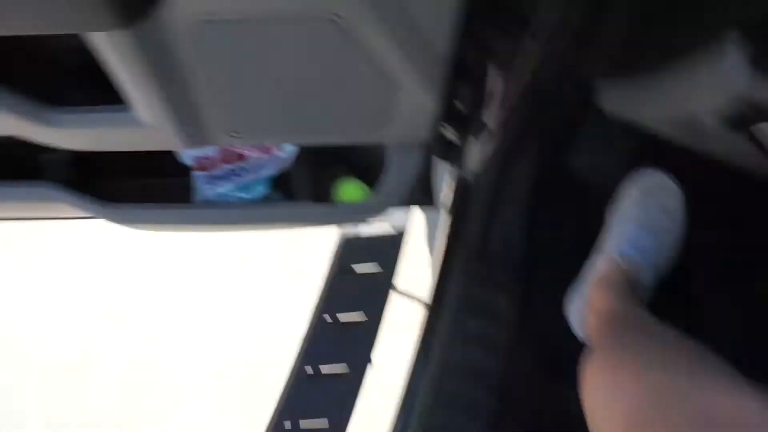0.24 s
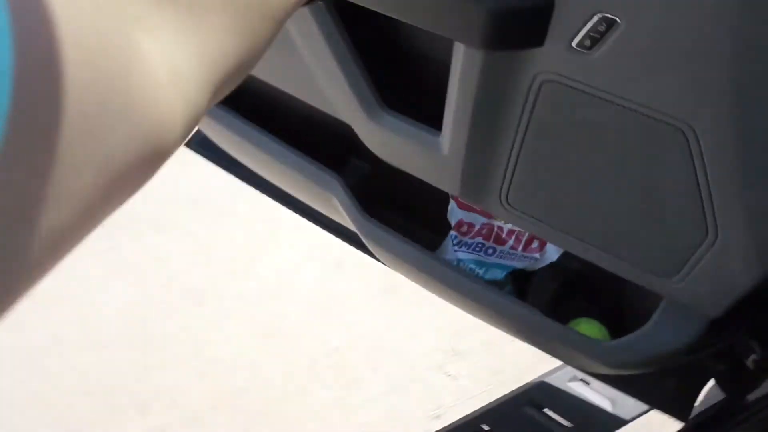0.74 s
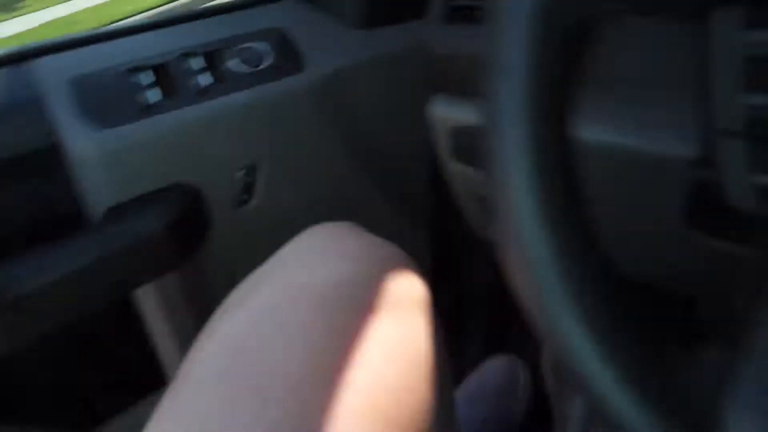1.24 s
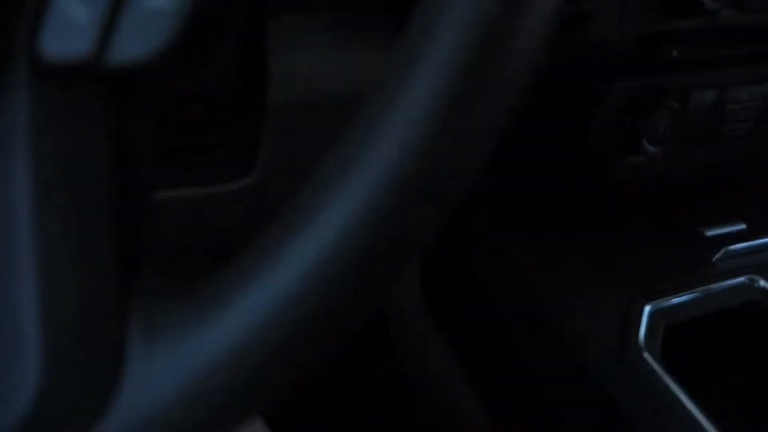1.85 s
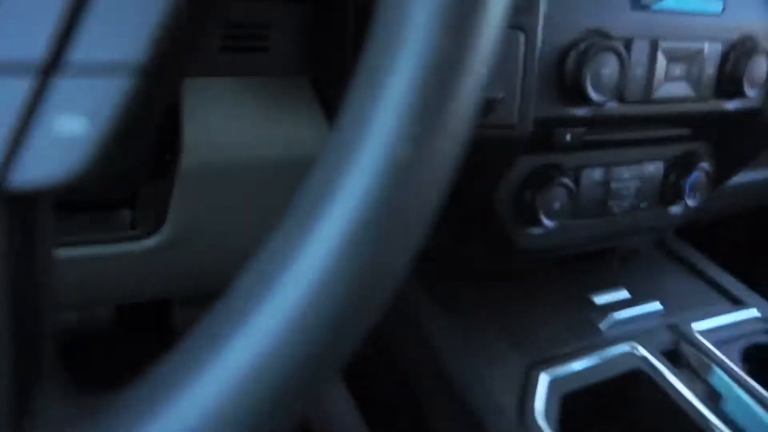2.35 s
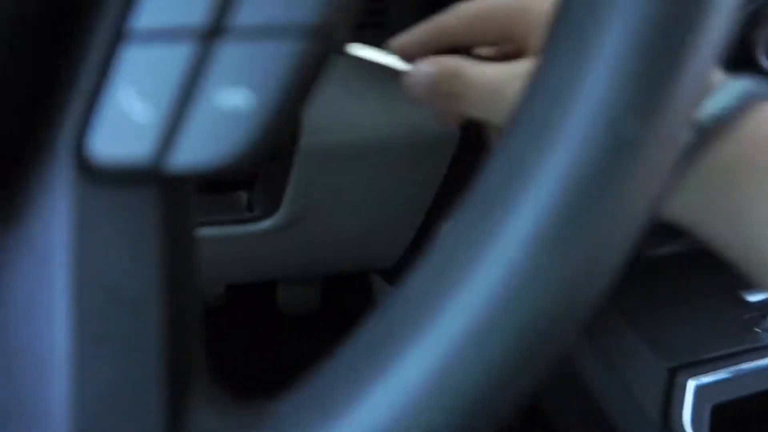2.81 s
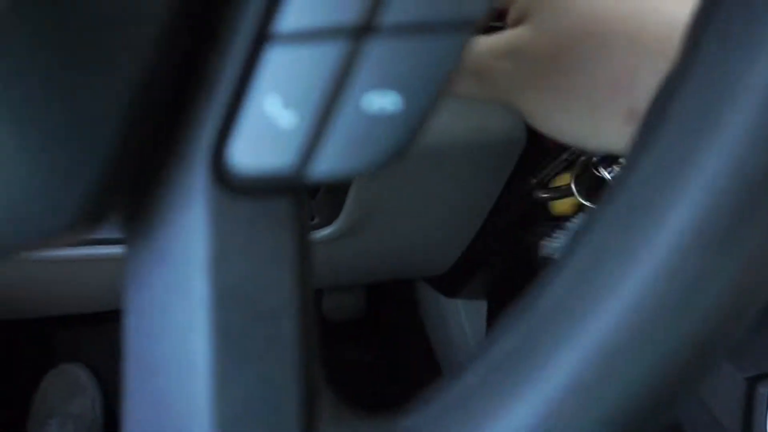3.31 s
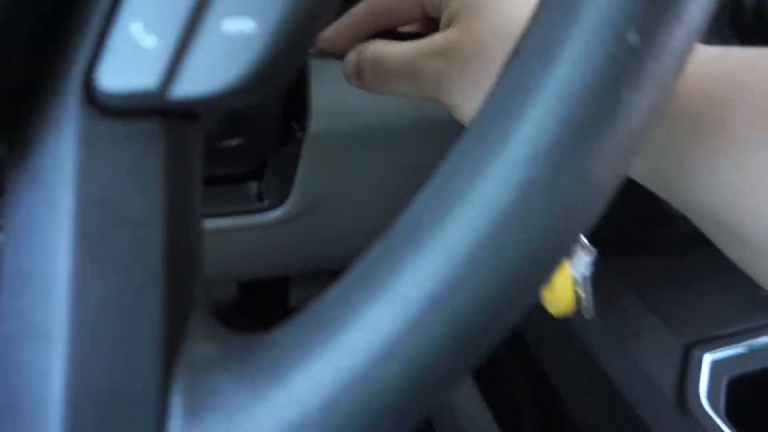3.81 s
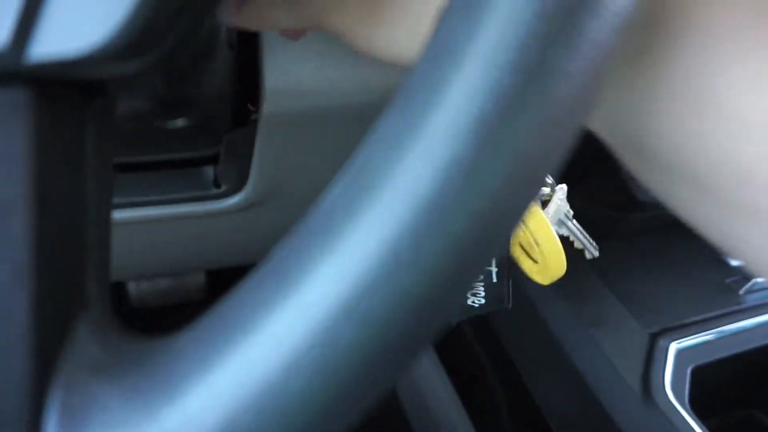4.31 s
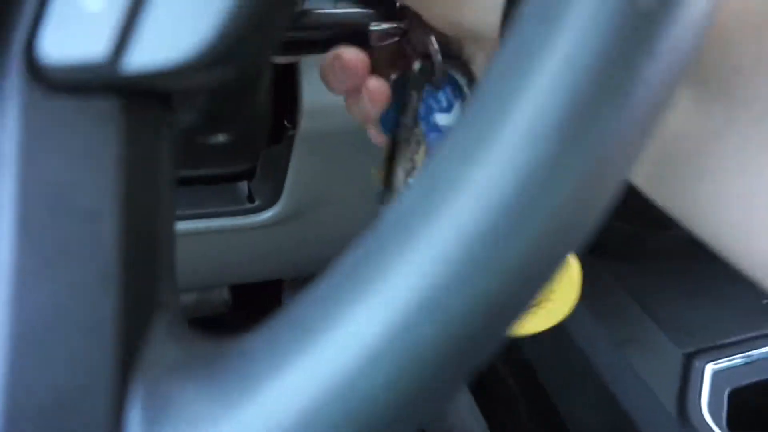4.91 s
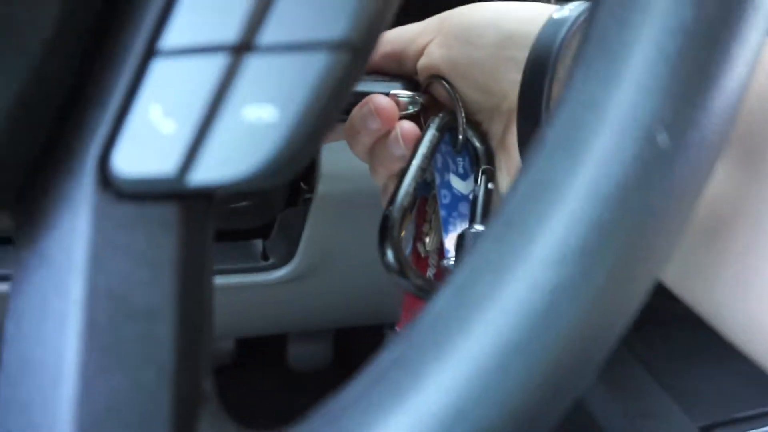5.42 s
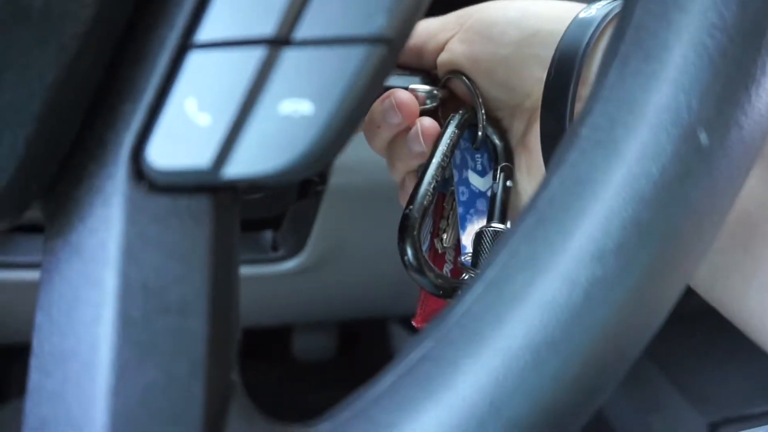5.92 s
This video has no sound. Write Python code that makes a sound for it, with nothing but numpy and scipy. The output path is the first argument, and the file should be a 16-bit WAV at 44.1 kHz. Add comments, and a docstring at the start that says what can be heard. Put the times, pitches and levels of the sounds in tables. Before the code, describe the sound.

Camera handling ticks and cloth rustle, a vehicle door thuds shut, keys jangle and knock at the ignition, then the engine starts cranking.

```python
"""A bunch of keys jingles and knocks in a pickup cab: noise grains plus decaying metal and plastic modes. The
key rasps into the lock as filtered grains; the engine rumbles as noise and harmonics of a rising firing rate,
under tonal swells: low starter whine and one higher whistle. Before that the door shuts: noise bursts, panel
modes and low cab tones. A camera is held in hand: its casing ticks and bumps, skin and clothes rub as grains
through moving combs. Low-level coloured noise is the cab background."""
import sys
import numpy as np
from scipy import signal
from scipy.fft import rfft, irfft, next_fast_len
from scipy.io import wavfile
from scipy.ndimage import uniform_filter1d

SR = 44100
rng = np.random.default_rng(int(sys.argv[2]) if len(sys.argv) > 2 else 0)


def transcribe(signal):
    """Save signal, clipped to [-1, 1], as a 16-bit WAV file at the path in sys.argv[1]."""
    frames = np.atleast_2d(signal).T
    limited = np.clip(frames, -1, 1)
    pcm = np.round(limited * 32767).astype(np.int16)
    wavfile.write(sys.argv[1], SR, pcm)


N = 271215
T = np.arange(N) / SR
SHORT = T[:SR // 2]  # time axis of one blow, s


# Key clashes: t/s, relative level/dB, clatter length/s
KEY_CLASHES = [(2.5084, -20.5, 0.015), (2.6552, -19, 0.047), (2.686, -19.5, 0.063), (2.7712, -12, 0.04),
               (2.791, -5, 0.026), (2.8483, -7.5, 0.013), (2.948, -24, 0.04), (2.993, -21, 0.035),
               (3.1997, -25.5, 0.035), (3.302, -16.5, 0.056), (3.3172, -12, 0.06), (3.8558, -15.5, 0.018),
               (4.015, -27.5, 0.024), (4.074, -18.5, 0.016), (4.2733, -9, 0.033), (4.3308, -11, 0.3),
               (4.433, -8.5, 0.025), (4.4897, -12, 0.036), (4.605, -24, 0.014), (4.671, -12.5, 0.015),
               (4.7264, -16, 0.04), (4.782, -10.5, 0.08), (4.789, -5, 0.033), (4.8982, -11.5, 0.046),
               (4.9231, -11, 0.08), (5.0645, -19, 0.035), (5.2963, -30, 0.045), (5.356, -31.5, 0.016),
               (5.625, -37, 0.018)]
# Clash spectrum: f/Hz, level/dB
CLASH_SPECTRUM = [(880, -17), (1500, -10), (2770, 0.5), (3550, -5.5), (4590, -1.5), (5020, 0), (9370, 0.5),
                  (11200, 5), (16000, -8)]
# Metal modes of the keys: f/Hz, level/dB
KEY_MODES = [(5755, -11), (7150, -9), (8543, -9.5), (9800, -7), (10930, -16.5), (11150, -1), (11650, -11),
             (12300, -7), (12610, 0.5), (14200, -16), (14860, -6)]
# Free-hanging key sings: t/s, relative level/dB, hold before decay/s
KEY_RINGS = [(2.68, -27.5, 0.018), (2.7952, -20, 0.005), (2.955, -18, 0.022), (2.98, -14, 0.014),
             (3.032, -16, 0.018), (3.075, -22, 0.022), (3.17, -31, 0.026), (3.3024, -11, 0.0089),
             (3.5214, -29.5, 0.02), (3.787, -32, 0.036), (4.0756, -43, 0.0038), (4.356, -15, 0.0099),
             (4.5307, -24.5, 0.0085), (4.573, -28, 0.026), (4.916, -25, 0.018), (5.188, -35.5, 0.005),
             (5.2954, -41.5, 0.032)]
RING_HZ, RING_T60_S = 10185, 0.17


def keys():
    """Metal contacts clatter as grains and excite key modes; one free key sings; the bunch jingles between."""
    out = np.zeros((2, N))
    for t_s, db, length_s in KEY_CLASHES:
        contacts = grains(len(SHORT), rate_hz=1700, spread_db=1, t60_s=0.021)
        contacts = contacts * fade(2 * length_s) * onset(0.0006)
        metal = ring(KEY_MODES, t60_s=0.16, scatter_db=5, detune=0.02) * onset(0.003)
        clash = peak(colour(contacts, CLASH_SPECTRUM), db - 8) + peak(metal, db - 19)
        add(out, t_s, clash, pan_db=2 + 2 * rng.standard_normal())

    for t_s, db, hold_s in KEY_RINGS:
        tone = ring([(RING_HZ, 0)], t60_s=np.inf, scatter_db=0, detune=0.001)
        tone = tone * amp(-60 * np.maximum(SHORT - hold_s, 0) / RING_T60_S)
        # chatter against the key ring: level trembles, 130 random points/s
        chatter = 1 + 0.25 * np.interp(SHORT * 130, np.arange(200), rng.standard_normal(200))
        neighbours = ring(KEY_MODES, t60_s=0.2, scatter_db=5, detune=0.018)
        singing = peak(tone * chatter, db - 0.5) + peak(neighbours, db - 15)
        add(out, t_s, singing * onset(0.0015), pan_db=5.5)

    clinks = np.zeros((2, N))
    for t_s in rng.uniform(KEY_CLASHES[0][0], KEY_CLASHES[-1][0], size=130):
        clink = ring(KEY_MODES, t60_s=0.11, scatter_db=7, detune=0.035)
        add(clinks, t_s, peak(clink, 2 * rng.standard_normal()))
    contacts = grains(N, rate_hz=210, spread_db=2.5, t60_s=0.087)
    jingle = 0.52 * unit(colour(contacts, CLASH_SPECTRUM)) + 1.05 * clinks
    add(out, 0, amp(-0.5) * swing() * jingle, pan_db=0.5)
    return out


# Hand moves bunch and key: t/s, hold/s, jingle level/dB, scrape level/dB
HAND_MOVES = [(2.65, 0.5, -32.5, -53.5), (2.95, 0.041, -38, -78), (3.19, 0.023, -29, -60),
              (3.45, 0.22, -37.5, -51.5), (3.78, 0.1, -38, -51.5), (4.08, 0.17, -46, -37.5),
              (4.28, 0.23, -39.5, -27.5), (4.5, 0.23, -49, -41), (4.72, 0.16, -29, -33.5),
              (4.905, 0.049, -23.5, -28), (4.99, 0.13, -62, -51.5), (5.16, 0.27, -66, -51.5)]
MOVE_RISE_S, MOVE_T60_S = 0.013, 0.3
SWING_DB, SWING_T60_S = -26, 0.92  # jingle left by a clash: level re clash, decay


def swing():
    """Jingle gain: hand movement and the decaying swing after each clash add in power."""
    moved = gestures(HAND_MOVES, MOVE_RISE_S, MOVE_T60_S)[0]
    stirs = [(t_s, length_s, db + SWING_DB) for t_s, db, length_s in KEY_CLASHES]
    stirred = gestures(stirs, MOVE_RISE_S, SWING_T60_S)[0]
    return np.hypot(moved, stirred)


# Key and fob knocks: t/s, hollow level/dB, edge level/dB, body level/dB (all relative)
KNOCKS = [(2.615, -31, -29, -65), (2.793, -27, -17, -42.5), (2.851, -7, -9.5, -26),
          (3.012, -29.5, -32, -30.5), (3.073, -34.5, -56, -35.5), (3.193, -24.5, -52.5, -42.5),
          (3.438, -15, -21, -33), (3.455, -24, -25, -42), (3.606, -25, -35.5, -32.5),
          (3.72, -27.5, -46, -33.5), (3.736, -26, -43, -30), (4.084, -30, -25, -69),
          (4.131, -17.5, -25, -35.5), (4.229, -14.5, -25.5, -46), (4.274, -7.5, -8, -29),
          (4.306, -10.5, -11.5, -43), (4.38, -7, -9.5, -40.5), (4.399, -16, -14, -37),
          (4.418, -12, -7.5, -47.5), (4.436, -6, -12, -27.5), (4.456, -10, -19, -32),
          (4.469, -8.5, -24, -27), (4.73, -18.5, -19, -41), (4.774, -16, -17.5, -39), (4.79, -16, -14, -48),
          (4.896, -19.5, -15.5, -39), (4.931, -17.5, -18.5, -35), (5.069, -24, -30.5, -51)]
# Column contact spectrum: f/Hz, level/dB
COLUMN_SPECTRUM = [(300, -6.5), (500, -6.5), (820, 2), (1400, -2.5), (1900, -7), (2500, -24)]
# Modes of the hollow plastic column: f/Hz, level/dB
COLUMN_MODES = [(716, -2.5), (825, 3.5), (985, -4), (1130, -6.5), (1434, -15.5), (1720, -7), (2220, 1.5),
                (2700, -11.5), (3600, -21.5)]
# Lock contact spectrum: f/Hz, level/dB
LOCK_SPECTRUM = [(1400, 2), (2400, 1), (3400, 2.5), (4600, -3.5), (7000, -13)]


def ignition():
    """Knocks excite the hollow plastic column; the key's contacts with the lock tumblers make a scrape."""
    out = np.zeros((2, N))
    for t_s, db, edge_db, body_db in KNOCKS:
        first = noise(len(SHORT)) * fade(0.014)
        bounces = grains(len(SHORT), rate_hz=1200, spread_db=4, t60_s=0.02) * fade(0.06)
        contacts = first + amp(5) * bounces
        modes = ring(COLUMN_MODES, t60_s=0.08, scatter_db=4, detune=0.02)
        hollow = peak(colour(contacts, COLUMN_SPECTRUM), db - 9) + peak(modes, db - 10)
        edge = peak(colour(contacts, LOCK_SPECTRUM), edge_db - 2)
        body = noise(len(SHORT)) * fade(0.081) * onset(0.00093)
        body = colour(body, [(160, -3.5), (300, -9.5), (430, 1.5), (600, -6)])
        add(out, t_s, hollow + edge + peak(body, body_db), pan_db=1)

    contacts = grains(N, rate_hz=360, spread_db=3.5, t60_s=0.008)
    scrape = amp(-2) * unit(colour(contacts, COLUMN_SPECTRUM))
    scrape += amp(-1) * unit(colour(contacts, LOCK_SPECTRUM))
    # the pushing hand shakes the column
    shudder = amp(-11.5) * unit(colour(noise(N), [(45, -18), (100, -1), (300, -9.5)]))
    push = gestures(HAND_MOVES, MOVE_RISE_S, MOVE_T60_S)[1]
    add(out, 0, push * (scrape + shudder), pan_db=-0.5)
    return out


# Engine gain while it turns over: t/s, relative level/dB
CRANK_LEVELS = [(5.17, -53), (5.23, -34), (5.48, -41), (5.7, -35), (5.8, -34.5), (5.9, -37.5), (6.03, -27),
                (6.15, -30)]
# Engine rumble spectrum: f/Hz, level/dB
ENGINE_SPECTRUM = [(13, -21), (22, -1.5), (65, 2.5), (159, -9.5), (206, -11), (404, -15), (446, -21.5),
                   (613, -32), (1110, -47), (2500, -50), (3250, -50), (5500, -77)]
# Firing rate: t/s, f/Hz
FIRING_RATE = [(5.2, 39.63), (5.75, 46.95), (6.1, 57.6)]
FIRING_DB = -11
# Tonal swells: centre t/s, level/dB, nominal tone f/Hz (low starter whine; one higher whistle near 1.1 kHz)
TONE_SWELLS = [(5.246, -42, 310), (5.417, -48.5, 1112), (5.54, -39.5, 456), (5.629, -37.5, 439),
               (5.721, -37.5, 459), (5.825, -36.5, 456.6), (5.93, -47, 425)]


def engine():
    """Bulkhead-muffled noise and firing harmonics throb; tones swell with noise around them: the starter whine
    and one higher whistle."""
    rumble = unit(colour(noise(N), ENGINE_SPECTRUM))
    # bass through the floor: same in both channels below about 350 Hz
    low_pass = signal.butter(2, 350, fs=SR, output="sos")
    rumble = rumble + signal.sosfiltfilt(low_pass, rumble.mean(axis=0) - rumble)

    firing_hz = np.interp(T, *np.transpose(FIRING_RATE))
    phase = 2 * np.pi * np.cumsum(firing_hz) / SR
    throb = np.sin(phase) + amp(-16) * np.sin(2 * phase) + amp(-0.5) * np.sin(3 * phase)
    out = curve(CRANK_LEVELS) * (amp(0.5) * rumble + amp(FIRING_DB) * throb)

    centre_s = SHORT.mean()
    for t_s, db, hz in TONE_SWELLS:
        swell = np.exp(-((SHORT - centre_s) / 0.034) ** 2)
        whine_hz = hz * (0.95 + 0.0604 * swell)
        whine = np.sin(2 * np.pi * np.cumsum(whine_hz) / SR)
        mesh_spectrum = [(0.75 * hz, -8), (hz, 0), (1.3 * hz, -13), (1.85 * hz, -13), (3 * hz, -24)]
        mesh = unit(colour(noise(len(SHORT)), mesh_spectrum))
        add(out, t_s - centre_s, swell * amp(db) * (whine + 0.5 * mesh))
    return out


# Door meets latch, seal, frame: t/s, latch level/dB, thud level/dB (both relative), t60/s, rise constant/s
DOOR_HITS = [(1.470, -5.5, -14, 0.057, 0.00015), (1.474, -13.5, -2.5, 0.069, 0.00068),
             (1.565, -17, -12, 0.11, 0.027), (1.59, -3, -13, 0.045, 0.0012),
             (1.598, -5.5, 1.5, 0.028, 0.00067)]
# Latch spectrum: f/Hz, level/dB
LATCH_SPECTRUM = [(500, 1.5), (1000, -7), (1800, -5.5), (2900, -16.5), (4900, -35), (12000, -41)]
# Trim thud spectrum: f/Hz, level/dB
THUD_SPECTRUM = [(140, -2), (190, -5), (300, 1), (470, -2), (620, -17), (900, -15.5)]
# Air resonances of the closed cab: f/Hz, level/dB, t60/s
CAB_BOOM = [(33.3, -16, 0.97), (43.7, -22, 0.29), (79.3, -25, 0.38), (98, -19, 0.075), (163, -40.5, 0.93)]
DOOR_SEALS_S = 1.61


def door():
    """Latch noise cracks, trim noise and panel modes thud; sealed cab air rings at low resonances."""
    out = np.zeros((2, N))
    for t_s, latch_db, thud_db, t60_s, rise_s in DOOR_HITS:
        latch = noise(len(SHORT)) * onset(rise_s) * (fade(t60_s) + amp(-45) * fade(0.11))
        trim = noise(len(SHORT)) * onset(rise_s) * (fade(t60_s) + amp(-31.5) * fade(0.36))
        panel = ring([(170, 8), (270, -3), (380, -10), (480, -2)], t60_s, scatter_db=-3, detune=0.022)
        hit = peak(colour(latch, LATCH_SPECTRUM), latch_db - 7.5)
        hit += peak(colour(trim, THUD_SPECTRUM), thud_db - 10.5)
        hit += peak(panel * onset(rise_s), thud_db - 13.5)
        add(out, t_s, hit, pan_db=3)

    air = sum(amp(db) * fade(t60_s) * np.sin(2 * np.pi * hz * SHORT) for hz, db, t60_s in CAB_BOOM)
    # rocking body stirs the air unevenly
    rocking = unit(colour(noise(len(SHORT)), [(32, 10), (50, -9), (90, -6.5)]))
    rocking = amp(-20) * fade(1.45) * rocking
    fade_out = np.clip((0.39 - SHORT) / 0.04, 0, 1)
    add(out, DOOR_SEALS_S, (air + rocking) * fade_out)
    return out


# Casing ticks under the fingers: t/s, shell level/dB, snap level/dB (both relative)
CASING_TICKS = [(0.171, -20, -31.5), (0.212, -17, -26), (0.2223, -15, -18), (0.2733, -17.5, -27),
                (0.3068, -14, -13.5), (0.3624, -40, -15), (0.555, -7.5, -16), (0.603, -13, -16.5),
                (0.667, -8.5, -19), (0.675, -8, -11.5), (0.9689, -14, -21.5), (0.9914, -23, -19),
                (1.0218, -23, -24), (1.3265, -27.5, -57), (2.1814, -8, -28), (2.248, -4.5, -37.5),
                (2.2846, -23, -35)]
# Dull bumps of body and hand: t/s, relative level/dB, f/Hz
HAND_BUMPS = [(0.036, -13, 308), (0.572, -9, 293), (0.648, -12, 340), (0.7038, -4, 567),
              (0.925, -16.5, 146), (0.95, -15.5, 129), (1.101, -24.5, 164), (1.3264, -21, 447),
              (1.37, -24.5, 173), (2.411, -29.5, 362), (2.439, -29.5, 600)]


def casing():
    """Finger ticks excite short plastic-shell modes with rattle and snap noise; bumps are low-pitched thuds."""
    out = np.zeros((2, N))
    for t_s, db, snap_db in CASING_TICKS:
        shell = ring([(2400, -3), (2850, 0), (3400, -6)], t60_s=0.008, scatter_db=0, detune=0.04)
        shell = shell * onset(0.0005)
        rattle = colour(noise(len(SHORT)) * fade(0.028), [(2100, -5), (2750, -1), (5000, -20)])
        snap = colour(noise(len(SHORT)) * fade(0.023), [(3000, 8.5), (6000, 1), (9700, 6), (15000, -3.5)])
        tick = peak(shell, db - 8) + peak(rattle, db - 23) + peak(snap, snap_db - 2)
        add(out, t_s, tick, pan_db=2.5)
    for t_s, db, hz in HAND_BUMPS:
        body = noise(len(SHORT)) * fade(0.07) * onset(0.00095)
        body = colour(body, [(120, -9), (hz, 0), (1400, -13), (3000, -26)])
        mode = ring([(hz, 0)], t60_s=0.03, scatter_db=0, detune=0.01)
        add(out, t_s, peak(body, db - 9.5) + peak(mode, db - 4.5))
    return out


# Hand or sleeve strokes on the camera: t/s, hold/s, rustle level/dB, hiss level/dB (both relative)
STROKES = [(-0.02, 0.092, -32.5, -41.5), (0.24, 0.24, -32.5, -37), (0.365, 0.32, -23.5, -33),
           (0.512, 0.013, -34, -23.5), (0.77, 0.31, -36, -36.5), (0.81, 0.096, -45, -28),
           (0.875, 0.02, -29, -20.5), (1.09, 0.11, -35.5, -45), (1.38, 0.027, -38, -38.5),
           (1.525, 0.017, -32, -34.5), (1.882, 0.012, -51, -47.5), (1.97, 0.24, -46, -38),
           (2.305, 0.058, -39, -38), (2.4, 0.03, -39.5, -33), (2.46, 0.054, -50, -44)]
STROKE_RISE_S, STROKE_T60_S = 0.015, 0.2
CLOTHES_DB = -41.5  # relative, until the door seals
# Rustle spectrum: f/Hz, level/dB
RUSTLE_SPECTRUM = [(180, -16), (300, -3), (818, -5.5), (975, -5.5), (1940, -8.5), (6000, -25), (7800, -64),
                   (13200, -120)]
# Hiss spectrum: f/Hz, level/dB
HISS_SPECTRUM = [(2000, -3), (3200, -1.5), (6300, -7), (8500, -6), (9800, -3.5), (11800, -5.5), (16000, -9)]
# Weight on the seat: t/s, relative level/dB
SEAT_LEVELS = [(0.0, -32.5), (0.28, -35.5), (0.58, -30.5), (0.71, -40.5), (1.31, -39), (1.53, -40),
               (1.74, -50.5), (1.9, -45), (2.08, -48.5), (2.55, -68)]
SEAT_GAIN_DB = 1.5
# Seat rumble spectrum: f/Hz, level/dB
RUMBLE_SPECTRUM = [(15, -47), (25, -17.5), (91, 1.5), (208, 0.5), (291, -4), (700, -9), (910, -43),
                   (1540, -120)]


def rubbing():
    """Skin and cloth stick and slip as noise grains; the seat rumbles under shifting weight."""
    rustle_gain, hiss_gain = gestures(STROKES, STROKE_RISE_S, STROKE_T60_S)
    clothes = amp(CLOTHES_DB) * (T < DOOR_SEALS_S)
    rustle_gain = np.hypot(rustle_gain, clothes)
    hiss_gain = np.hypot(hiss_gain, amp(-8) * clothes)
    rustle = colour(grains(N, rate_hz=1100, spread_db=2.5, t60_s=0.014), RUSTLE_SPECTRUM)
    hiss = colour(grains(N, rate_hz=1600, spread_db=4, t60_s=0.02), HISS_SPECTRUM)
    seat = unit(colour(grains(N, rate_hz=330, spread_db=2, t60_s=0.046), RUMBLE_SPECTRUM))
    out = amp(-4) * rustle_gain * sliding(rustle)
    out += amp(-2) * hiss_gain * sliding(hiss)
    return out + amp(SEAT_GAIN_DB) * curve(SEAT_LEVELS) * seat


def sliding(x):
    """Reflection off the moving hand: an echo at a drifting 0.2-1.4 ms delay makes a moving comb."""
    delay_s = np.repeat(rng.uniform(0.0002, 0.0014, size=N // 1500 + 1), repeats=1500)
    delay_s = uniform_filter1d(delay_s, size=1500)[:N]
    echo = np.array([np.interp(T - delay_s, T, channel) for channel in x])
    return unit(x + 0.75 * echo)


# Background spectrum: f/Hz, level/dB
CAB_SPECTRUM = [(35, -2), (80, -1.5), (430, -12), (1400, -22), (3000, -25), (4400, -36), (16000, -41.5)]
CAB_RMS_DB = -52.5


def background():
    """Steady coloured noise of the quiet cab."""
    return amp(CAB_RMS_DB) * unit(colour(noise(N), CAB_SPECTRUM))


def amp(db):
    """Decibels to gain."""
    return 10 ** (np.asarray(db) / 20)


def along(points, hz):
    """Interpolate (f/Hz, value) points on a log-frequency axis."""
    f_hz, value = np.transpose(points)
    return np.interp(np.log(hz + 1), np.log(f_hz), value)


def colour(x, points):
    """Minimum-phase filter with the given spectrum, falling a further 22.7 dB/octave past its ends."""
    hz = np.fft.rfftfreq(8192, 1 / SR) + 1
    below, above = np.log2(points[0][0] / hz), np.log2(hz / points[-1][0])
    outside_oct = np.maximum(0, np.maximum(below, above))
    cepstrum = irfft(np.log(amp(along(points, hz) - 22.7 * outside_oct)))
    # fold the cepstrum: causal, minimum phase
    cepstrum[1:len(hz) - 1] *= 2
    cepstrum[len(hz):] = 0
    impulse = irfft(np.exp(rfft(cepstrum)))
    return signal.fftconvolve(x, impulse[None], axes=1)[:, :x.shape[1]]


# Likeness of the two microphones: f/Hz, correlation/1
MIC_LIKENESS = [(350, .87), (1000, .5), (2500, .25), (10000, .55)]


def noise(size):
    """Stereo white noise whose channel correlation varies with frequency."""
    padded = next_fast_len(size, True)
    mid, side = rfft(rng.standard_normal((2, padded)))
    alike = np.clip(along(MIC_LIKENESS, np.linspace(0, SR / 2, len(mid))), 0, 1)
    mid, side = mid * np.sqrt(1 + alike), side * np.sqrt(1 - alike)
    return irfft([mid + side, mid - side], padded)[:, :size]


def unit(x):
    """Scale to rms 1."""
    return x / np.sqrt(np.mean(x ** 2))


def peak(x, db):
    """Scale a blow so that its loudest 3 ms has this rms level."""
    power = uniform_filter1d(np.mean(x ** 2, axis=0), size=132)
    return x * amp(db) / np.sqrt(power.max())


def fade(t60_s):
    """Exponential decay, t60 at least 1 ms."""
    return amp(-60 * SHORT / max(t60_s, 0.001))


def onset(rise_s):
    """Exponential contact build-up with this time constant."""
    return 1 - np.exp(-SHORT / max(rise_s, 1 / SR))


def ring(modes, t60_s, scatter_db, detune):
    """Decaying sine modes with random level, pitch and inter-microphone phase per blow."""
    out = 0
    for hz, db in modes:
        level, pitch, phase = rng.standard_normal(3)
        angle = 2 * np.pi * hz * (1 + detune * pitch) * SHORT
        shift_rad = min(hz / 1500, 1) * (1.62 + 0.74 * phase)
        out = out + amp(db + scatter_db * level) * np.sin([angle + shift_rad, angle])
    return out * fade(t60_s)


def grains(size, rate_hz, spread_db, t60_s):
    """Random tiny contacts as decaying noise bursts, mostly small, over a weak noise floor."""
    chance = rng.random(size)
    strength = np.minimum(rng.exponential(size=size), 4)
    power = (chance < rate_hz / SR) * amp(spread_db * strength) ** 2
    power = signal.lfilter([1], [1, -amp(-120 / (t60_s * SR))], power)  # amplitude falls 60 dB in t60
    return unit(noise(size) * np.sqrt(power + 0.19 * power.mean()))


def curve(rows):
    """Gain from (t/s, level/dB) rows, with 17 ms ramps to silence outside their span."""
    t_s, db = np.transpose(rows)
    outside_s = np.maximum(t_s[0] - T, T - t_s[-1])
    return amp(np.interp(T, t_s, db)) * np.clip(1 - outside_s / 0.017, 0, 1)


def gestures(rows, rise_s, t60_s):
    """Movements rise, hold and decay, summed in power: one gain curve per level column."""
    power = 0
    for t_s, hold_s, *db in rows:
        rise = np.clip((T - t_s) / rise_s, 0, 1)
        shape = rise * amp(-60 * np.maximum(T - t_s - hold_s, 0) / t60_s)
        power = power + np.outer(amp(db), shape) ** 2
    return np.sqrt(power)


def add(out, t_s, x, pan_db=0):
    """Mix in at a time; positive pan favours the left."""
    start = max(int(t_s * SR), 0)
    panned = x * amp([[pan_db / 2], [-pan_db / 2]])
    out[:, start:start + x.shape[1]] += panned[:, :N - start]


def from_right(x, lag_s):
    """Source on the right: sound reaches the left microphone later."""
    return np.array([np.interp(T - lag_s, T, x[0]), x[1]])


def scene():
    """Mix all sources; keys and ignition also excite short, padded-cab reflections."""
    near = keys() + from_right(ignition(), lag_s=0.00015)
    reflections = rng.standard_normal((2, len(SHORT))) * fade(0.035) * (SHORT > 0.003)
    reflections /= np.sqrt(np.sum(reflections ** 2) / 2)
    cab = amp(-11) * signal.fftconvolve(near, reflections, axes=1)[:, :N]
    return near + cab + engine() + door() + casing() + rubbing() + background()


TOP_HZ = 15900


def record(dry):
    """Camera input clips at full scale; a steep low-pass cuts the top."""
    low_pass = signal.ellip(10, 0.2, 80, TOP_HZ, fs=SR, output="sos")
    return signal.sosfilt(low_pass, np.clip(dry, -1, 1))


dry = scene()
out = record(dry)
transcribe(out)
```